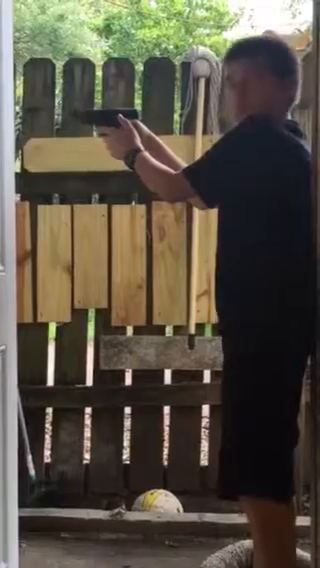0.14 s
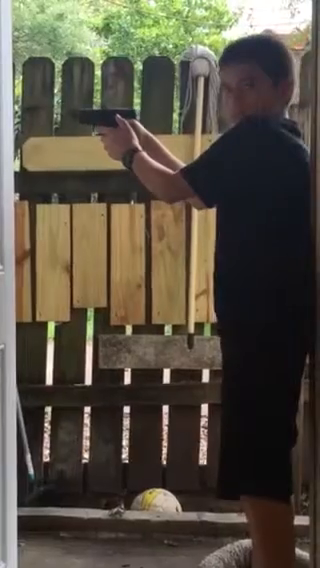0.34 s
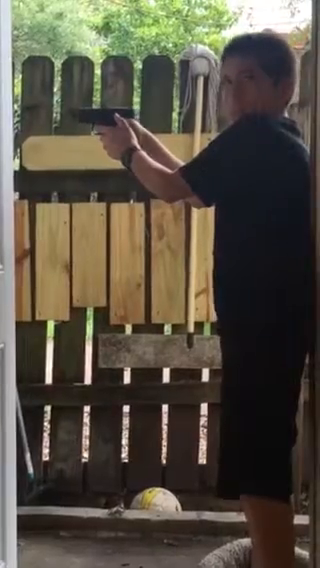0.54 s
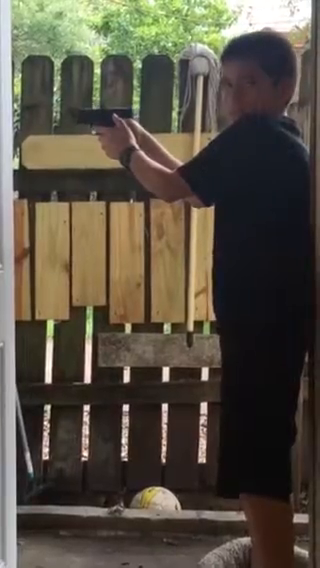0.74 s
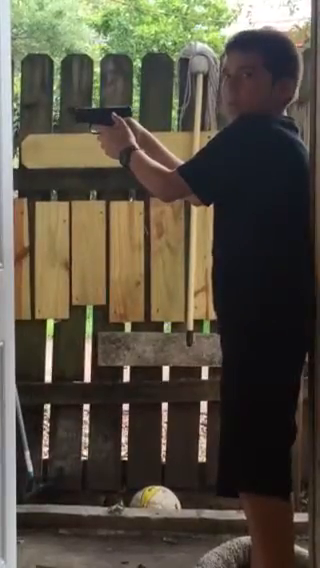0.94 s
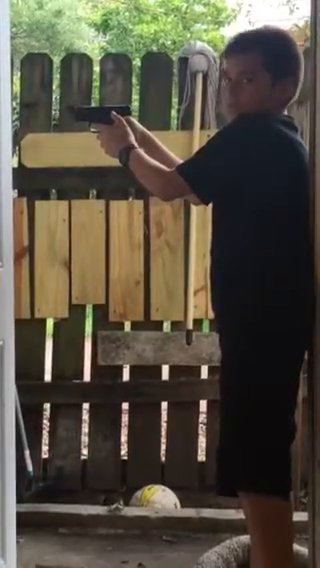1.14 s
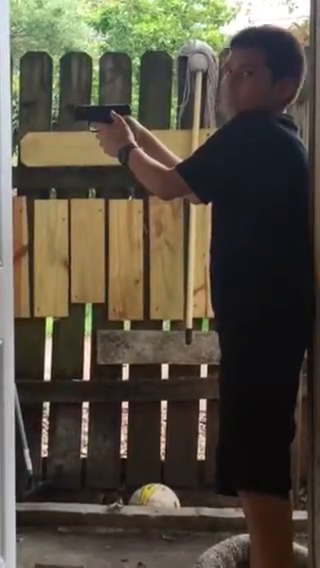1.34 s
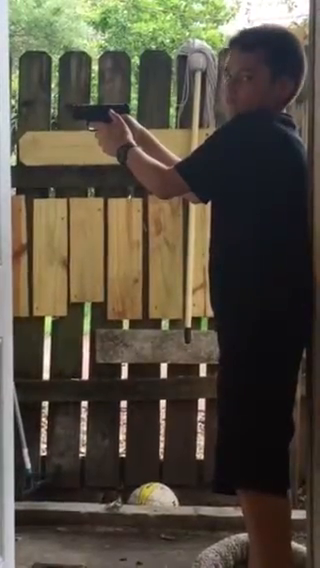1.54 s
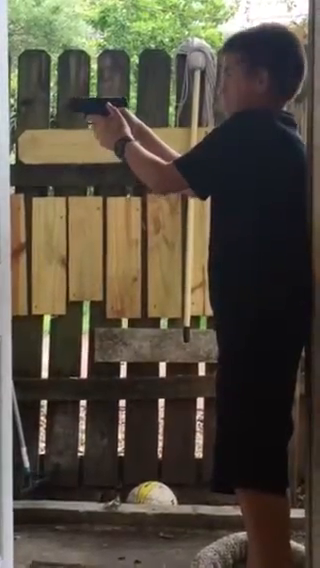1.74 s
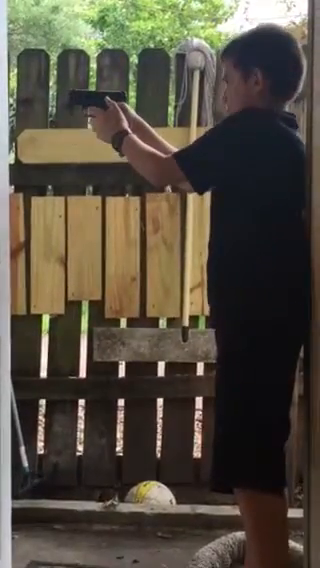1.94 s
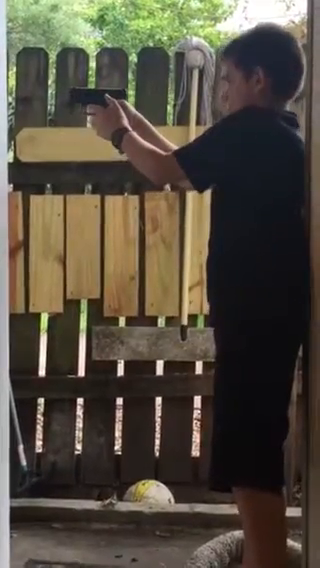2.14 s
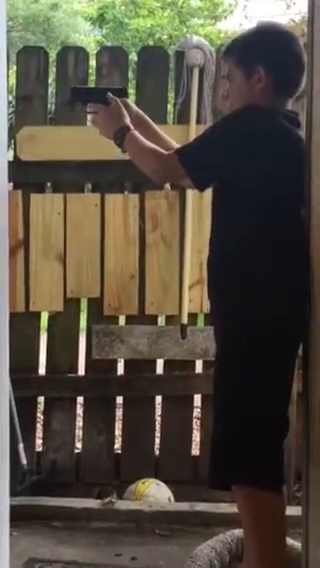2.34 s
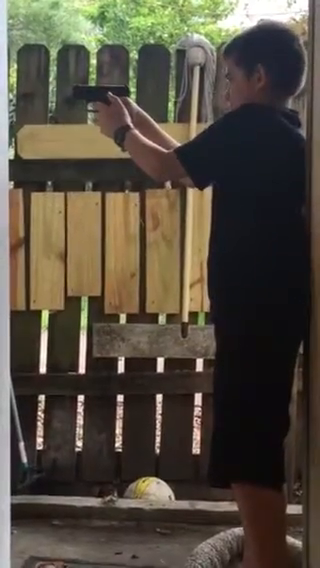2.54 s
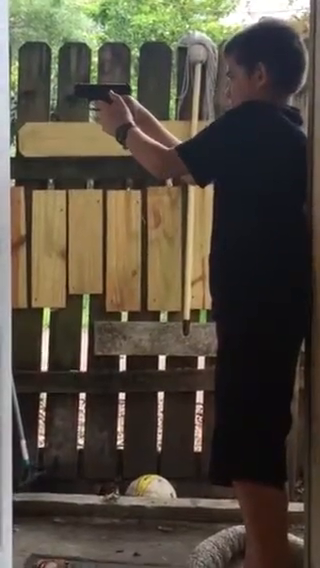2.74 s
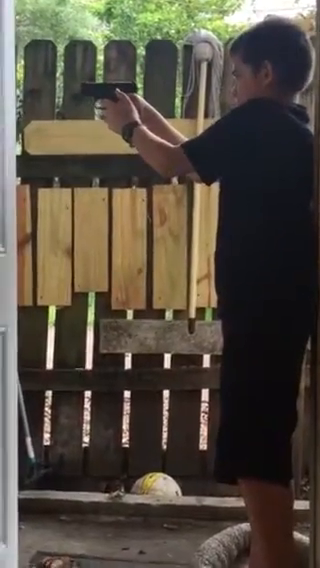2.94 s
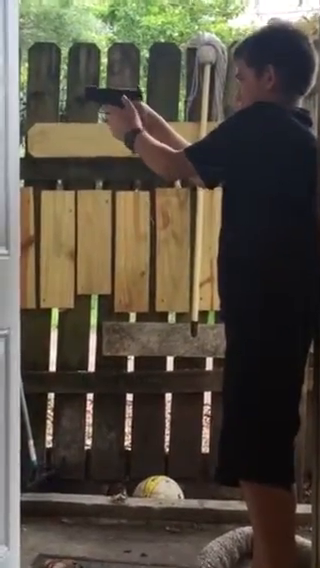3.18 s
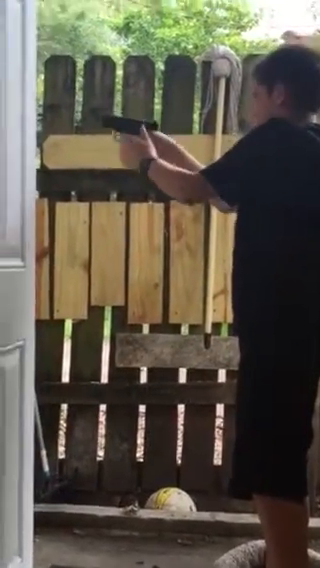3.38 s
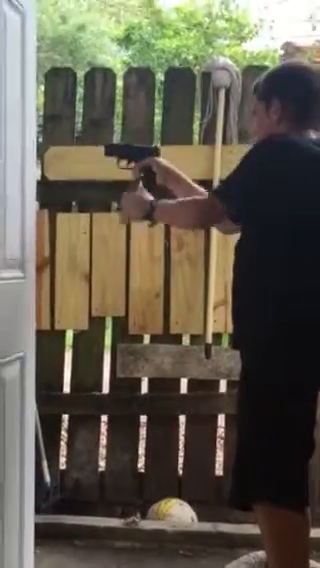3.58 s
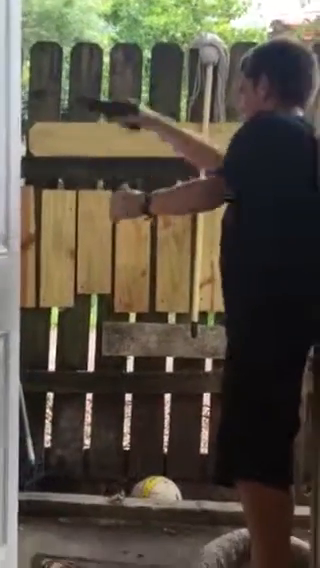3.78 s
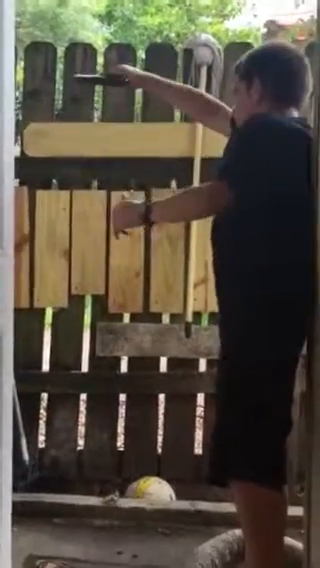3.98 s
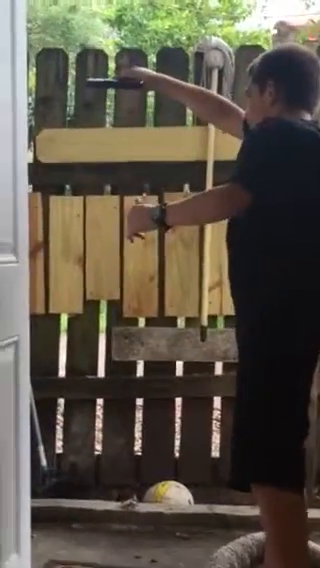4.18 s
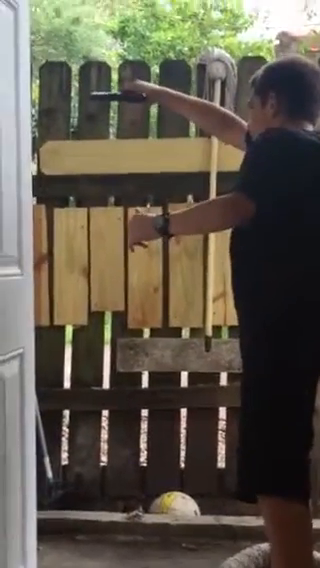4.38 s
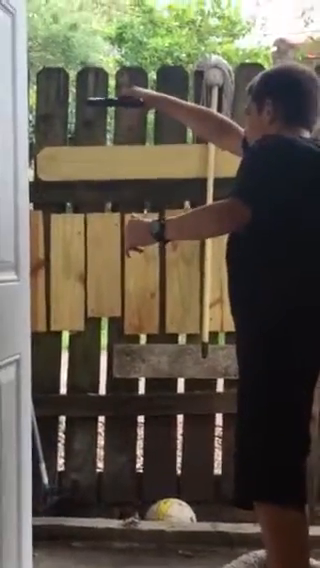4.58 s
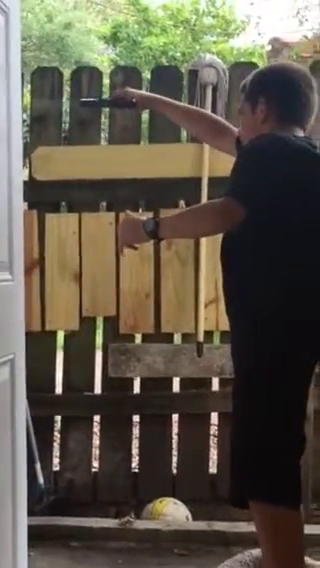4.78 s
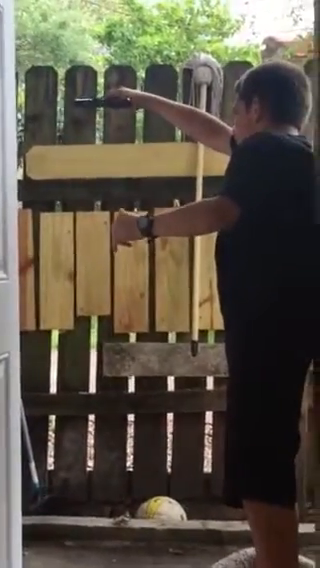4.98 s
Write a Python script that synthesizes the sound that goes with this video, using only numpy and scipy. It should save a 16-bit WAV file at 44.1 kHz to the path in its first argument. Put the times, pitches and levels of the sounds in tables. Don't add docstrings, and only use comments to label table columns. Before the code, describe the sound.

In a small fenced, roofed yard an air conditioner throbs and hums with a soft fan rush. Cloth rustles, a trigger ticks and creaks, then a gas pistol pops three times. After a pause with faint handling clicks, two more pops follow with a more metallic ring. A phone microphone clips the blasts and ducks the background.

```python
import sys
import numpy as np
from scipy import signal
from scipy.fft import rfft, irfft, next_fast_len
from scipy.io import wavfile
from scipy.ndimage import uniform_filter1d, map_coordinates

SR = 44100
rng = np.random.default_rng(int(sys.argv[2]) if len(sys.argv) > 2 else 0)


def convert_level_to_amplitude(level_db):
    exponent = np.asarray(level_db, float) / 20
    return 10 ** exponent


def transcribe(signal):
    frames = np.atleast_2d(signal).T
    limited = np.clip(frames, -1, 1)
    pcm = np.round(limited * 32767).astype(np.int16)
    wavfile.write(sys.argv[1], SR, pcm)


N = 221293

# order, level in dB.
SHAFT_ORDERS = [(1, -44), (2, -53.5), (3, -51.5), (4, -53.5), (5, -69), (7, -68), (8, -74.5), (10, -67.5),
                (16, -66.5), (21, -73)]
# frequency in Hz, level in dB, width in Hz.
MOTOR_HUM = [(88.3, -55.5, 13), (124.4, -48.5, 3.3), (361, -57.5, 14)]
# time in seconds, gain in dB.
COMPRESSOR_LOAD = [(0, -1.5), (2, 0), (3.5, 1), (4, -1.5), (4.5, 0), (5.02, 8)]
# frequency in Hz, width in Hz, level in dB.
CASING_MODES = [(1012, 100, -8), (1468, 39, 11.5), (2260, 60, -6.5), (3400, 300, -11), (5636, 1300, -19)]
# frequency in Hz, level in dB per Hz.
FAN_SPECTRUM = [(15, -50), (30, -13.5), (59, 2), (236, -8), (390, -15), (503, -18.5), (1400, -25.5),
                (1780, -34.5), (2220, -27.5), (2600, -39.5), (3400, -40), (4700, -47), (5800, -46.5),
                (15000, -56.5)]
# frequency in Hz, level in dB per Hz.
CLOTH_SPECTRUM = [(1200, -34), (2200, 5.5), (4000, -5), (7000, -11), (15000, -18.5)]
# time in seconds, peak in dB, rise in dB per second, fall in dB per second.
ARM_MOVES = [
    (2.04, -70, 200, 90),
    (3.6, -78, 300, 100),
    (3.85, -80, 30, 30),
    (4.15, -72, 40, 20),
    (4.385, -58, 350, 140),
]
# time in seconds, peak in dB, tilt in dB per octave.
GRIP_TICKS = [(1.975, -69, 2), (2.031, -58, 1), (2.045, -64, -7), (2.077, -54, -13), (4.372, -47, -2),
              (4.382, -52, -2), (4.3885, -45, -6)]
# start in seconds, strength in dB.
SHOTS = [
    (2.2615, 1),
    (2.5983, 0),
    (2.957, 0),
    (4.6045, 1.5),
    (4.9267, 1),
]
# frequency in Hz, level in dB, t60 in
# seconds.
SLIDE_MODES = [(672, -20, .05), (902, -20, .06), (1276, -18.5, .07), (2110, -15, 0.046), (2306, -13, 0.096),
               (2460, -13, 0.063), (8400, -9, .014)]
# frequency in Hz, width in Hz, level in dB.
BARREL_MODES = [(900, 290, 4), (1273, 250, 4.5), (2205, 1200, 4.5), (3610, 1400, 0.5), (4980, 1100, -1),
                (5850, 450, 3.5), (7094, 660, 0.5), (8275, 850, 2.5), (9700, 500, -12), (11050, 700, -4.5),
                (12300, 280, -13), (14100, 1000, -14), (16080, 1000, -11)]
# frequency in Hz, width in Hz, depth from 0 to 1.
BARREL_GAPS = [(10480, 420, .95), (9300, 260, .6), (7900, 260, .5), (11900, 300, .5)]
# frequency in Hz, level in dB.
CRACK_SPECTRUM = [(100, -2), (800, 2), (1240, -6), (2400, 10), (4500, -0.5), (8500, 2.5), (15000, -1)]
# frequency in Hz, level in dB.
YARD_SPECTRUM = [(35, -37), (60, 7.5), (150, 24.5), (270, 24.5), (310, 0.5), (380, 3), (440, 8.5),
                 (530, -0.5), (750, 4.5), (1500, 5), (5000, -2.5), (16000, -1)]
# frequency in Hz, t60 in seconds.
YARD_T60 = [(100, 0.16), (300, 0.28), (500, 0.31), (800, 0.33), (1800, 0.41), (4800, 0.46), (9000, 0.39),
            (14000, 0.28)]
# frequency in Hz, level in dB.
FAR_SPECTRUM = [(300, -63.5), (600, -37.5), (1200, -24.5), (4000, -23), (9000, -23.5), (15000, -37)]
# delay in seconds, level in dB.
WALL_ECHOES = [(.0011, 3.5), (.0022, 5.5), (.0034, -3), (.0047, -12.5), (.0063, -4.5), (.008, -3.5),
               (.0105, -8), (0.0118, -15.5), (.016, -8), (.0235, -12)]

SIDEWAYS_S = 3.8


def unit(x):
    return x / np.sqrt(np.mean(x ** 2) + 1e-20)


def since(s):
    return np.arange(N) / SR - s


def along(points, hz):
    f, v = np.transpose(points)
    return np.interp(np.log(hz + 1), np.log(f + 1), v)


def curve(rows):
    s, v = np.transpose(rows)
    return np.interp(since(0), s, v)


def wobble(rate):
    knots = rng.standard_normal(int(N * 40 / SR) + 4)
    return map_coordinates(knots, [np.arange(N) * min(rate, 40) / SR])


def filtered(x, response):
    m = next_fast_len(len(x) + 8192)
    return irfft(rfft(x, m) * response(np.fft.rfftfreq(m, 1 / SR)), m)[:len(x)]


def resonances(modes, hz):
    return sum(convert_level_to_amplitude(db) * 1j * hz * w / (c * c - hz * hz + 1j * hz * w) for c, w, db in modes)


def narrow(centre_hz, width_hz):
    noise = rng.standard_normal(N)
    return unit(filtered(noise, lambda hz: 1 / (1 + (2 * (hz - centre_hz) / width_hz) ** 2)))


def rush(spectrum, patchy_db):
    z = signal.stft(rng.standard_normal(N), nperseg=512)[2]
    field = uniform_filter1d(rng.standard_normal(z.shape), size=6, axis=0)
    field = uniform_filter1d(field, size=12, axis=1)
    x = signal.istft(z * convert_level_to_amplitude(patchy_db * unit(field)), nperseg=512)[1][:N]
    return unit(filtered(x, lambda hz: convert_level_to_amplitude(along(spectrum, hz))))


def valve(turn):
    taps = np.diff(np.floor(turn / (2 * np.pi)), prepend=0) * convert_level_to_amplitude(1.5 * wobble(43))
    t = np.arange(SR // 10) / SR
    rattle = rng.standard_normal(SR // 10) * convert_level_to_amplitude(-60 * t / .09)
    taps = signal.fftconvolve(taps, rattle)[:N]

    def casing(hz):
        high_pass = hz ** 2 / (hz ** 2 + 900 ** 2)
        return resonances(CASING_MODES, hz) * high_pass / (1 + (hz / 6500) ** 6)

    return convert_level_to_amplitude(-69) * unit(filtered(taps, casing))


def conditioner():
    shaft_hz, whine_hz = 57.76, 2227
    whine_db, whine_sag_db_per_s = -60, 1.7
    t = since(0)
    turn = 2 * np.pi * np.cumsum(shaft_hz + .03 * wobble(2.5)) / SR
    orders = 0
    for k, db in SHAFT_ORDERS:
        level = convert_level_to_amplitude(db + 4.0 + (1.0 + 0.11 * k) * wobble(12))
        orders = orders - level * np.cos(k * turn + .14 * wobble(14))
    taps = valve(turn)
    hum = 0
    for hz, db, width_hz in MOTOR_HUM:
        tone = np.sin(2 * np.pi * hz * t + 1.7 * wobble(3.6))
        hum = hum + convert_level_to_amplitude(db) * (1.1 * tone + .6 * narrow(hz, width_hz))
    whine = np.sin(2 * np.pi * whine_hz * t) + 0.44 * narrow(whine_hz, width_hz=91)
    whine = convert_level_to_amplitude(whine_db - whine_sag_db_per_s * t) * whine
    fan = convert_level_to_amplitude(-47) * rush(FAN_SPECTRUM, patchy_db=1.0)
    return convert_level_to_amplitude(curve(COMPRESSOR_LOAD)) * orders + taps + hum + whine + fan


def shirt():
    level = convert_level_to_amplitude(-83.5)
    for s, db, rise, fall in ARM_MOVES:
        level = level + convert_level_to_amplitude(db - np.maximum(-rise * since(s), fall * since(s)))
    return level * convert_level_to_amplitude(2.5 * wobble(25)) * rush(CLOTH_SPECTRUM, patchy_db=0.0)


def barrel(hz, tilt_db):
    return resonances(BARREL_MODES, hz) * convert_level_to_amplitude(tilt_db * np.log2(hz / 3000 + .02))


def ticks():
    rows = [(s, db, tilt_db, .018) for s, db, tilt_db in GRIP_TICKS]
    sear_lead_s, chatter_s, hammer_lead_s = .0233, .0035, .009
    for s, _ in SHOTS:
        sear_db = -42 + 7 * (s == SHOTS[0][0])
        for k in range(5):
            rows.append((s - sear_lead_s + k * chatter_s, sear_db - 2.5 * k, -3 + 2 * k, .008))
        rows.append((s - hammer_lead_s, -39, -12, .04))
    return rows


def squeak():
    start_s, length_s, edge_s = 2.18, .06, .02
    t = since(start_s)
    pull = np.clip(np.minimum(t, length_s - t) / edge_s, 0, 1)
    return convert_level_to_amplitude(-62) * pull * narrow(3100, width_hz=110)


def trigger():
    out, t = np.zeros(N + SR), np.arange(SR // 4) / SR
    for s, db, tilt_db, t60 in ticks():
        decay = convert_level_to_amplitude(-60 * t / max(t60, .003)) + convert_level_to_amplitude(-18 - 60 * t / .2)
        burst = rng.standard_normal(len(t)) * decay * (1 - np.exp(-t / (t60 / 20)))
        tick = filtered(burst, lambda hz: barrel(hz, tilt_db) * hz ** 4 / (hz ** 4 + 1900 ** 4))
        out[round(s * SR):][:len(t)] += convert_level_to_amplitude(db + 7.5) * tick / np.abs(tick).max()
    return out[:N] + squeak()


def slide():
    out, t = np.zeros(N + SR), np.arange(SR // 4) / SR
    for s, _ in SHOTS:
        ring = 0
        for hz, level, t60 in SLIDE_MODES:
            ring = ring + convert_level_to_amplitude(level + rng.normal(0, 2) - 60 * t / t60) * np.sin(2 * np.pi * hz * t)
        slide_db = 2.5 + 9.5 * (s > SIDEWAYS_S)
        out[round(s * SR):][:len(t)] += convert_level_to_amplitude(slide_db) * ring * (1 - np.exp(-t / 0.00076))
    return out[:N]


def tail():
    hz, t, z = signal.stft(rng.standard_normal(SR), SR, nperseg=512, noverlap=448)
    last = along([(2000, 0.4), (7000, 0.4), (15000, 0.29)], hz)[:, None]
    far = convert_level_to_amplitude(along(FAR_SPECTRUM, hz)[:, None] - 60 * t / 2.0 - 8.2 * (t / last) ** 5)
    fall = convert_level_to_amplitude(-60 * t / along(YARD_T60, hz)[:, None]) + far
    return signal.istft(z * fall, SR, nperseg=512, noverlap=448)[1][:SR]


def pistol():
    out, t = np.zeros(N + SR), np.arange(SR) / SR
    tilt_db, thump_hz, thump_t60 = 0.51, 115, .1
    same_tail = [tail(), tail()]
    for s, db in SHOTS:
        puff = 0.25 * rng.standard_normal(SR) * convert_level_to_amplitude(-60 * t / 0.015)
        puff[0] = 3.0
        early = puff + sum(convert_level_to_amplitude(wall_db) * np.roll(puff, round(late * SR)) for late, wall_db in WALL_ECHOES)
        crack = unit(filtered(early, lambda hz: barrel(hz, tilt_db) * convert_level_to_amplitude(along(CRACK_SPECTRUM, hz))))
        answer = 0.89 * same_tail[int(s > SIDEWAYS_S)] + 0.54 * tail()
        answer = answer * (1 - np.exp(-t / 0.00022))
        answer = unit(filtered(answer, lambda hz: barrel(hz, tilt_db) * convert_level_to_amplitude(along(YARD_SPECTRUM, hz))))
        thump_db = -29.5 + 4 * (s == SHOTS[0][0]) + 23.0
        thump = np.sin(2 * np.pi * thump_hz * t) * convert_level_to_amplitude(thump_db - 60 * t / thump_t60)
        thump = thump * (1 - np.exp(-t / 0.0014))
        out[round(s * SR):][:SR] += convert_level_to_amplitude(db) * (convert_level_to_amplitude(-14.0) * crack + convert_level_to_amplitude(-15) * answer + thump)
    return out[:N]


def gaps(hz):
    return np.prod([1 - depth * resonances([(c, w, 0)], hz) for c, w, depth in BARREL_GAPS], axis=0)


def scene():
    return (filtered(pistol() + trigger(), gaps) + conditioner() + shirt() + slide())[None]


def duck(s):
    depth_db, attack_s, settle_share, settle_s, hold_s, release_s = -10, .004, .3, .04, .2, .33
    t = np.clip(since(s), 0, None)
    drop = np.clip(t / attack_s, 0, 1) * (1 - settle_share * np.exp(-t / settle_s))
    return depth_db * drop * (1 - np.clip((t - hold_s) / release_s, 0, 1) ** 2)


def clipped(x, top):
    return x / (1 + np.abs(x / top) ** 8) ** (1 / 8)


def phone_band(hz):
    treble_cut = convert_level_to_amplitude(-50 / (1 + np.exp(np.clip((15350 - hz) / 45, -50, 50))))
    return treble_cut * hz / (hz - 20j)


def top_cut(x):
    return signal.sosfilt(signal.butter(12, 16540, fs=SR, output="sos"), x)


def record(dry):
    x = dry[0] * convert_level_to_amplitude(np.min([duck(s) for s, _ in SHOTS], axis=0))
    x = filtered(clipped(x, .66), phone_band)
    mix = clipped(x, .84)[None]
    return top_cut(mix)


dry = scene()
out = record(dry)
transcribe(out)
```